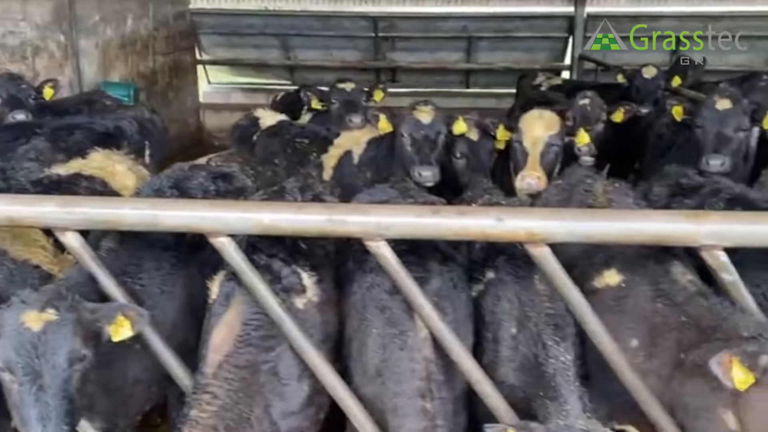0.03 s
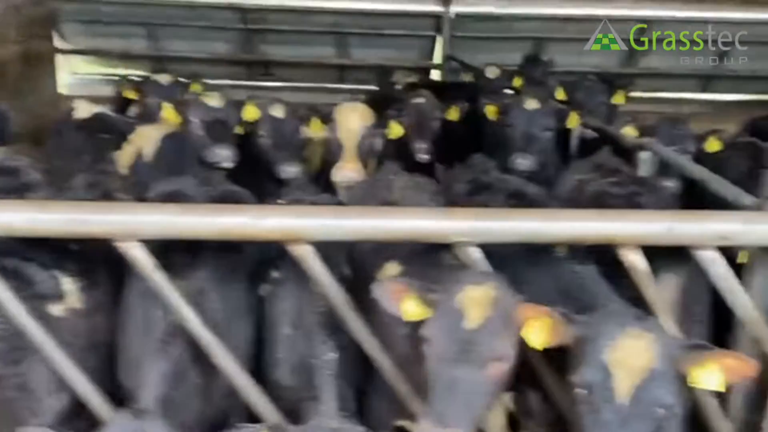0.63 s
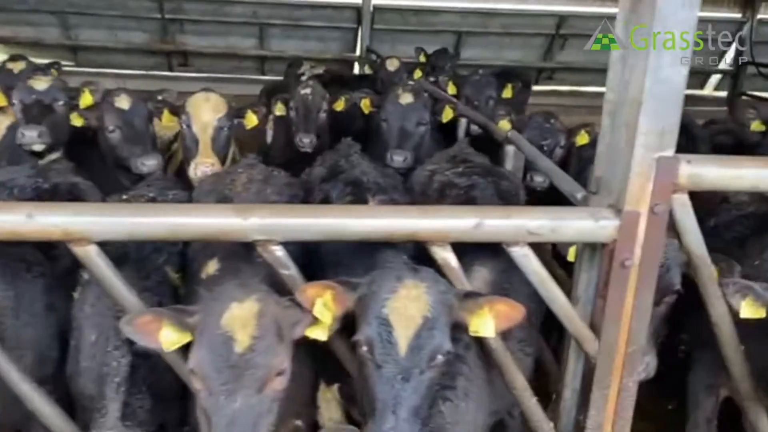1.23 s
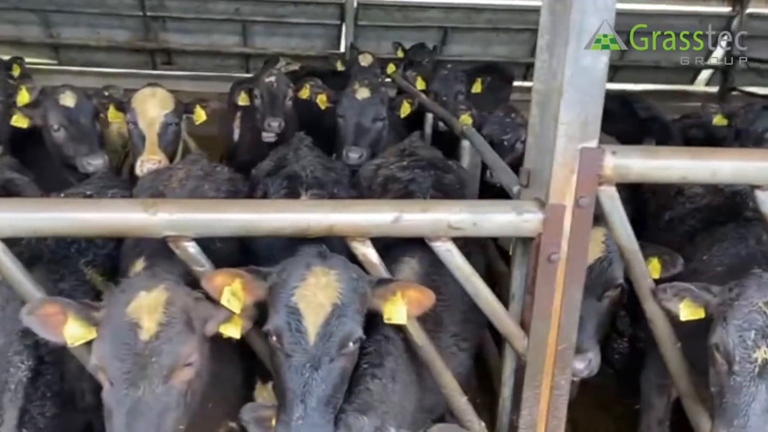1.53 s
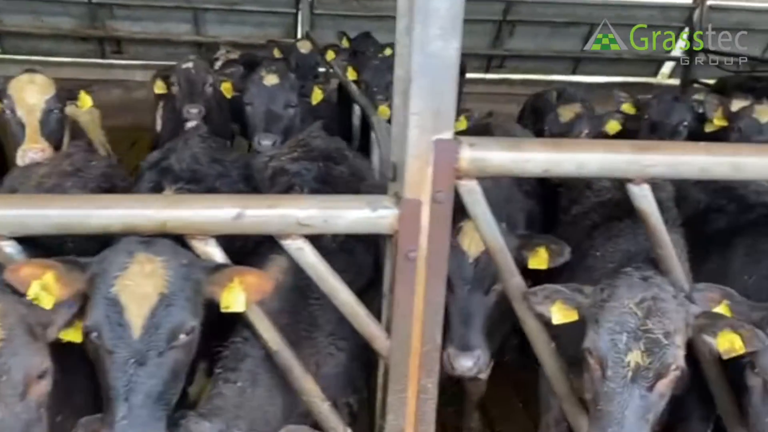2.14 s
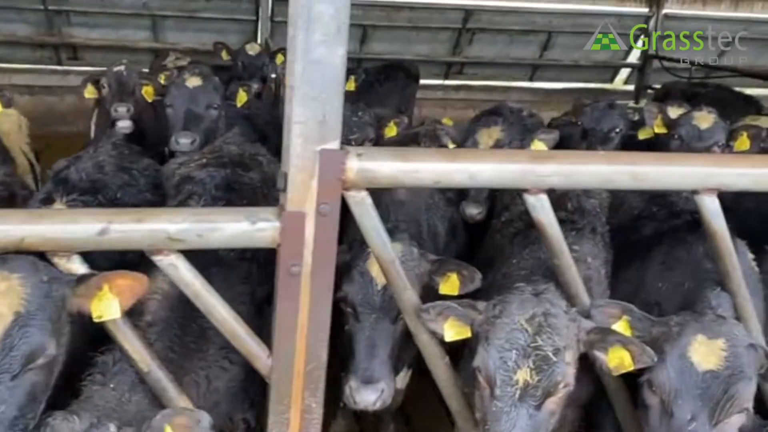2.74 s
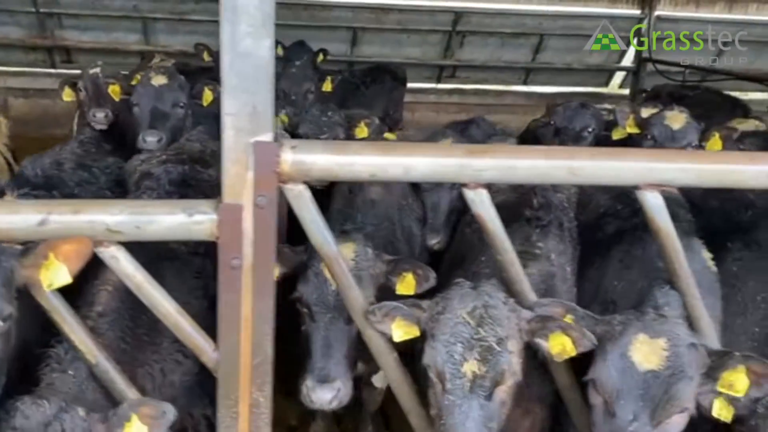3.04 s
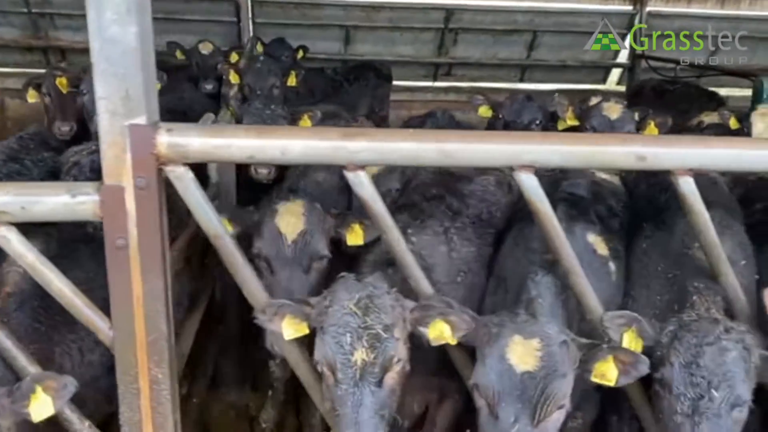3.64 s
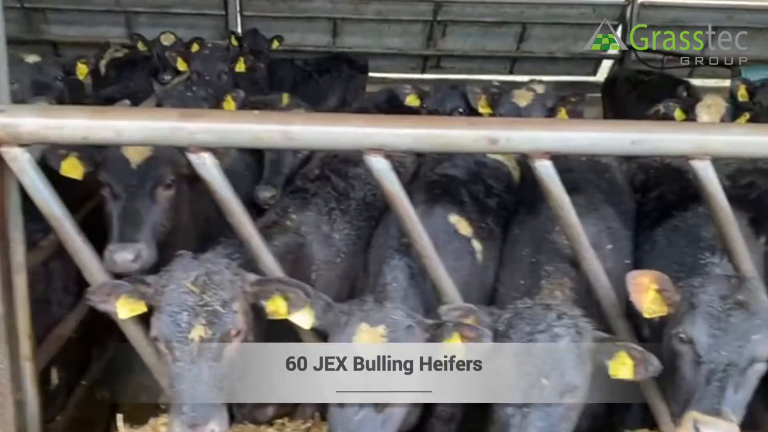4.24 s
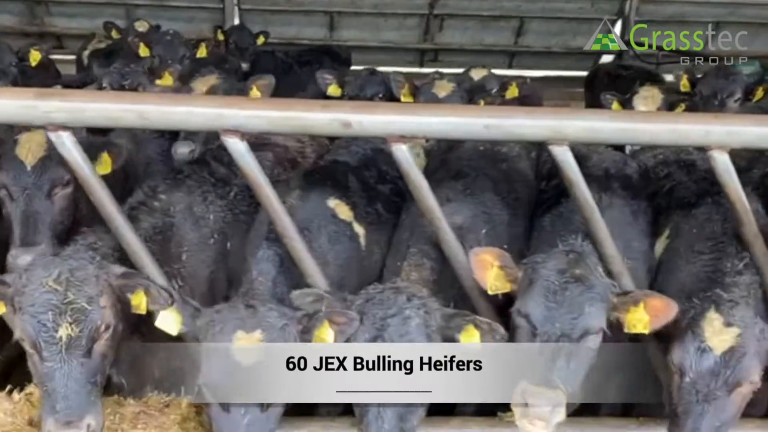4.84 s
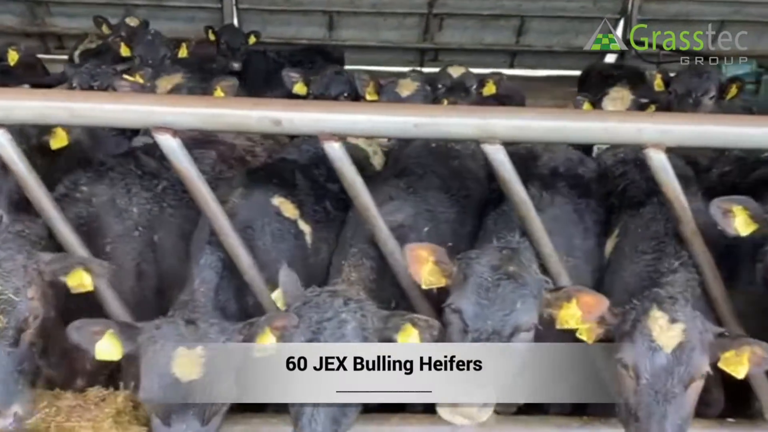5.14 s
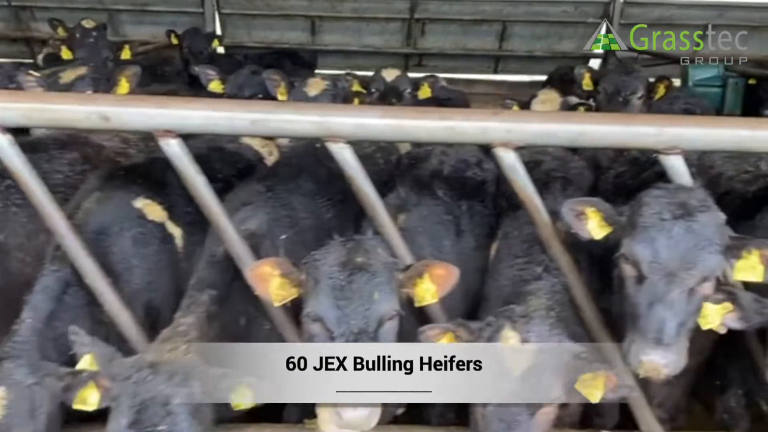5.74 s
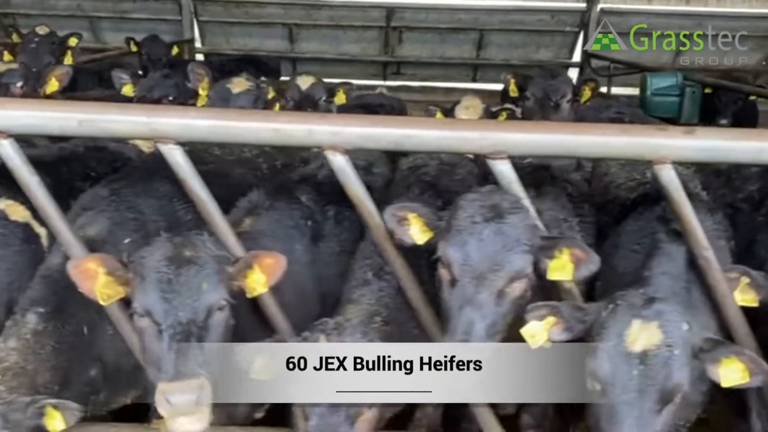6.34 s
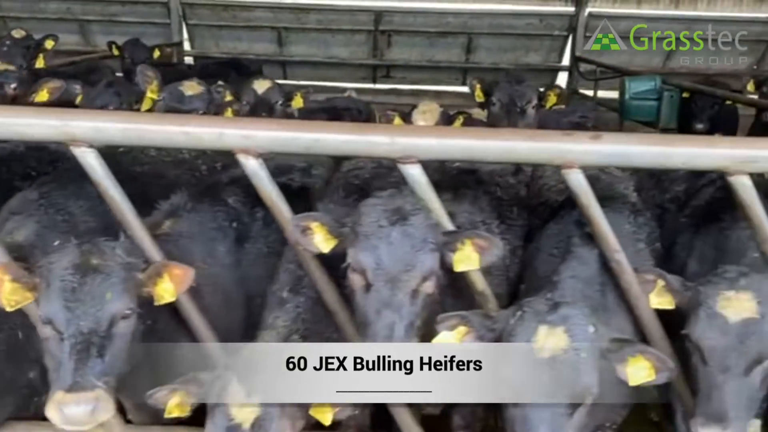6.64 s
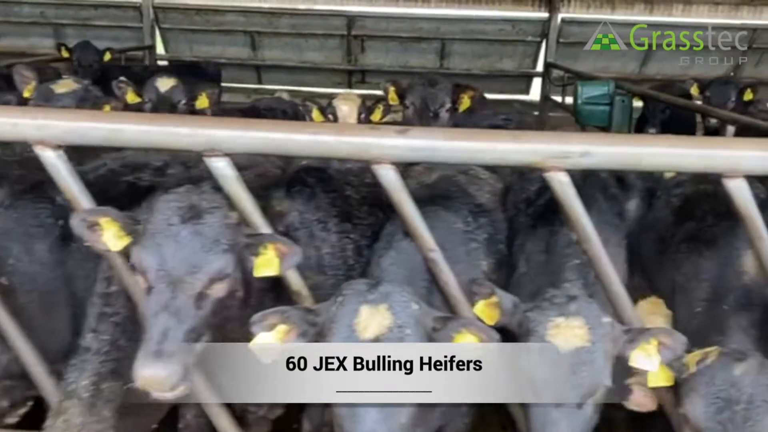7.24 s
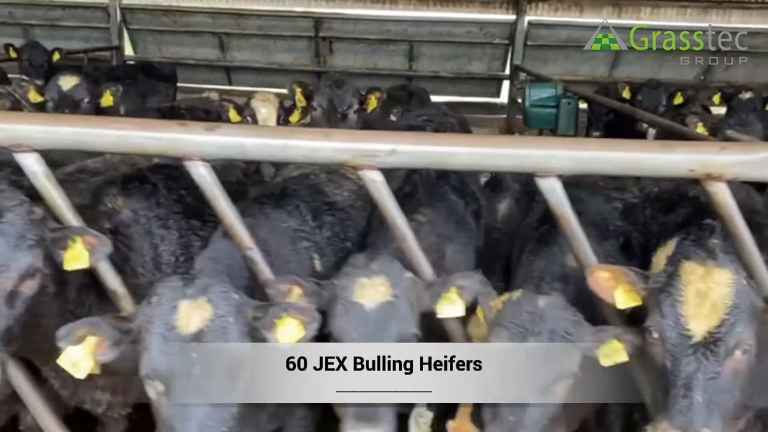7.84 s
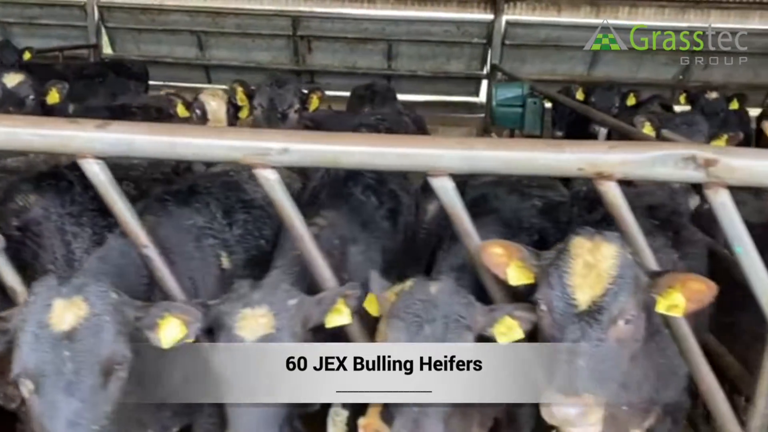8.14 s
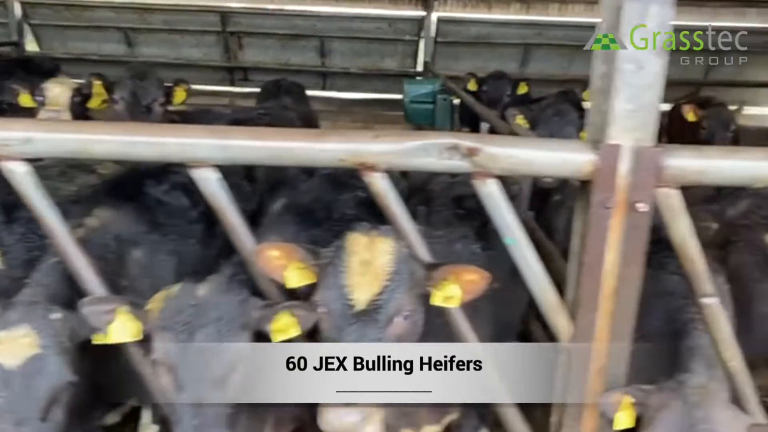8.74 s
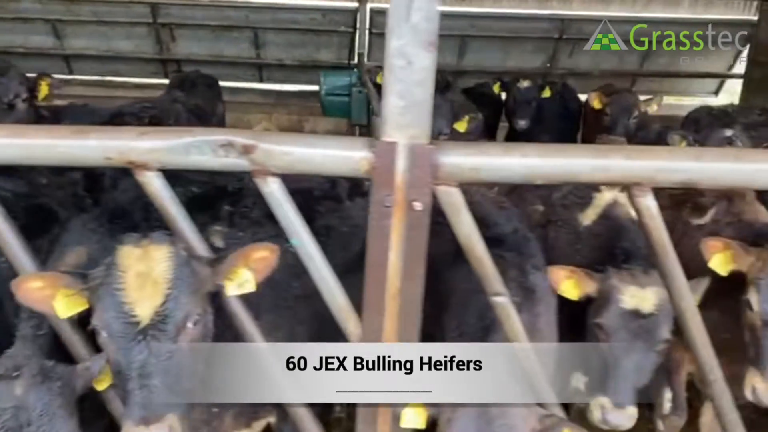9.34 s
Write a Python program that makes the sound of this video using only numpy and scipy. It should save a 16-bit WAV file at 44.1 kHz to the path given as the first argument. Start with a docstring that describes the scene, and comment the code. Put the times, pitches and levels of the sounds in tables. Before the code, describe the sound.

In an open cattle shed, light puffs of wind touch the microphone, then grow into hard, uneven gusts that rumble and thump. Beneath them a soft wash of shuffling animals and rustling fodder slowly fades in. Stalks snap faintly close by, a little to the left, as the cattle feed. Near the end a steel barrier clinks lightly four times and one more hard gust hits.

```python
"""An open cattle shed, from a camera's stereo microphone in the passage, near heifers at a steel barrier.
Light eddies touch both ports first, while the wash under the roof and the rustle of fodder fade in
over five seconds. From about 2.5 s gusts buffet the microphone hard, and close by, a little to the
left, stalks snap as the herd pulls at its feed. From 7.5 s the barrier clinks four times,
and one more hard gust hits just before the end."""
import sys
import numpy as np
from scipy import signal
from scipy.fft import rfft, irfft, next_fast_len
from scipy.io import wavfile
from scipy.ndimage import uniform_filter1d, map_coordinates

SR = 44100
rng = np.random.default_rng(int(sys.argv[2]) if len(sys.argv) > 2 else 0)


def to_wav(sig):
    """Store sig (one row per channel, or 1-D mono) as 16-bit WAV at the path in sys.argv[1].

    Samples outside -1..1 are clipped; the rate is SR.
    """
    pcm = np.clip(np.atleast_2d(sig), -1, 1) * 32767
    pcm = np.round(pcm).astype(np.int16)
    wavfile.write(sys.argv[1], SR, pcm.T)  # frames by channels


N = 422919

# gusts over the microphone, large eddies rumbling, small ones fluttering:
# start_s, hold_s, rumble_db, flutter_db
PORT_GUSTS = [(0.322, 0.11, -65.5, -75), (0.778, 0.15, -50, -58), (0.998, 0.12, -56.5, -76),
              (1.348, 0.063, -54.5, -61.5), (1.562, 0.079, -53, -59.5), (1.68, 0.029, -46.5, -48),
              (1.973, 0.059, -50, -58.5), (2.419, 0.17, -36.5, -45), (2.653, 0.053, -35, -48),
              (2.793, 0.07, -40, -51.5), (2.941, 0.029, -36, -39), (3.058, 0.094, -34, -47.5),
              (3.156, 0.045, -28, -37), (3.202, 0.023, -28, -33.5), (3.261, 0.094, -34, -37.5),
              (3.72, 0.1, -39, -48.5), (3.964, 0.041, -39, -51.5), (4.07, 0.22, -42, -50.5),
              (4.535, 0.036, -39, -54), (4.698, 0.21, -37.5, -47.5), (4.813, 0.095, -38.5, -46.5),
              (5.323, 0.18, -48, -53), (5.813, 0.019, -29, -39.5), (5.926, 0.14, -40, -59),
              (6.289, 0.042, -33.5, -46.5), (6.402, 0.19, -32.5, -45), (6.838, 0.22, -39.5, -56),
              (7.727, 0.01, -37, -71), (7.833, 0.039, -29, -41), (7.969, 0.083, -35, -50),
              (8.17, 0.09, -37.5, -51), (8.477, 0.045, -39.5, -54.5), (8.652, 0.016, -37.5, -64),
              (9.182, 0.029, -33, -38.5), (9.239, 0.065, -29, -45), (9.44, 0.051, -34, -44.5),
              (9.556, 0.031, -33.5, -48)]
# the breeze between gusts: time_s, rumble_db
BREEZE_LEVELS = [(0.0, -109), (0.13, -83.5), (0.4, -66.5), (1.25, -65.5), (1.8, -48.5), (2.2, -54.5),
                 (2.3, -46.5), (2.85, -54), (3.45, -42), (3.66, -54.5), (4.3, -45), (4.65, -41),
                 (4.97, -38.5), (5.07, -46.5), (5.3, -49), (5.76, -48.5), (6.2, -42.5), (6.68, -42.5),
                 (7.05, -46.5), (7.62, -49.5), (7.8, -45.5), (8.1, -43), (8.4, -52), (8.9, -46),
                 (9.14, -33.5), (9.3, -35.5), (9.42, -43.5)]
# colours of large eddies, small eddies and hard gusts at the ports: frequency_hz, relative_db
RUMBLE_SPECTRUM = [(15, -45), (30, -15.5), (50, 0.5), (66, 4), (100, -0.5), (160, -5.5), (250, -9),
                   (400, -15.5), (700, -43), (2000, -120)]
FLUTTER_SPECTRUM = [(100, -35.5), (220, -0.5), (350, 3), (550, 2.5), (800, -6), (1100, -14.5), (1600, -45),
                    (3000, -36), (6000, -120)]
TEARING_SPECTRUM = [(300, -11), (700, -1.5), (1300, 3.5), (2000, -12), (3200, -27.5), (6000, -35),
                    (12000, -75)]
# single eddies that hit the ports: start_s, level_db, centre_hz, edge_db
EDDY_HITS = [(0.312, -53.5, 476, -90), (0.44, -59, 340, -85), (0.531, -56, 494, -82),
             (0.756, -47.5, 604, -66), (0.886, -41.5, 248, -80), (1.32, -48, 140, -88),
             (1.567, -42, 110, -83), (1.626, -42.5, 160, -78), (1.697, -36.5, 198, -74),
             (1.806, -45.5, 160, -80), (2.01, -41, 457, -66), (2.413, -37, 486, -62),
             (2.548, -29, 574, -62), (2.582, -32.5, 450, -56), (2.665, -27, 480, -49.5),
             (2.674, -30, 90, -75), (2.951, -21, 515, -43.5), (3.143, -27, 410, -50),
             (3.197, -16.5, 396, -50), (3.212, -24.5, 220, -40.5), (3.217, -30, 560, -35),
             (3.253, -29, 624, -48), (3.269, -26, 746, -45), (3.278, -27, 557, -39.5),
             (3.287, -21.5, 550, -42.5), (3.312, -30, 560, -44.5), (3.333, -25, 133, -73),
             (3.716, -32.5, 335, -70), (3.806, -31, 128, -80), (3.837, -33, 110, -80),
             (3.887, -23, 197, -72), (3.97, -32, 447, -72), (4.073, -31.5, 420, -54),
             (4.207, -29, 323, -72), (4.234, -34.5, 98.5, -80), (4.34, -43, 110, -80),
             (4.532, -32, 420, -79), (4.82, -24, 460, -50), (4.904, -27.5, 85, -80),
             (5.105, -31.5, 204, -79), (5.154, -36, 108, -80), (5.211, -41, 191, -80),
             (5.412, -32.5, 179, -80), (5.605, -28.5, 260, -75), (5.802, -23.5, 430, -59),
             (5.809, -18.5, 406, -64), (5.837, -22.5, 410, -62), (5.852, -29, 80, -78),
             (5.925, -33.5, 218, -80), (5.98, -32, 233, -78), (6.03, -34.5, 263, -78),
             (6.087, -30.5, 533, -62), (6.34, -25, 510, -50), (6.392, -24, 327, -68),
             (6.409, -25.5, 250, -62), (6.466, -21, 437, -54), (6.511, -17.5, 252, -51),
             (6.624, -26.5, 99, -80), (6.738, -27, 131, -80), (6.893, -34.5, 650, -72),
             (6.983, -32, 110, -80), (7.029, -37, 300, -72), (7.123, -35.5, 150, -80),
             (7.163, -32.5, 97, -80), (7.343, -35, 170, -80), (7.53, -34, 220, -80), (7.828, -25, 447, -70),
             (7.929, -29, 418, -55), (8.003, -22.5, 96, -80), (8.038, -36, 430, -52),
             (8.219, -26, 500, -66), (8.643, -31.5, 397, -67), (9.169, -29, 690, -67),
             (9.2168, -16, 674, -43.5), (9.253, -24, 516, -57)]
# stalks breaking close by: start_s, level_db, centre_hz
STALK_SNAPS = [(2.73, -60, 4500), (3.3367, -52, 7500), (3.925, -48, 4100), (4.351, -59, 4500),
               (5.331, -57, 3800), (6.017, -51, 5850), (6.046, -53, 3600), (6.442, -55, 4470),
               (6.469, -54, 4200), (6.5414, -45, 5650), (6.94, -49, 4150), (7.149, -53, 3000),
               (7.287, -54, 10300), (7.9363, -47, 4160), (8.044, -56.5, 6000), (8.204, -52.5, 6300),
               (8.408, -53.5, 5460), (8.571, -50.5, 5470), (8.584, -58, 5000), (8.613, -46.5, 4550),
               (8.681, -47, 3400), (8.855, -49.5, 7150), (9.056, -52.5, 6000), (9.11, -45.5, 3280),
               (9.4443, -48, 5430), (9.503, -43.5, 7400)]
# mouthfuls of fodder pulled and dragged: middle_s, level_db, centre_hz, length_s
FODDER_SWISHES = [(0.704, -76, 7100, 0.069), (1.646, -70, 2980, 0.1), (2.09, -71, 9300, 0.07),
                  (4.492, -64, 10500, 0.041), (6.195, -52.5, 1840, 0.013), (7.153, -52, 1060, 0.025),
                  (7.201, -55.5, 1120, 0.086), (7.77, -56, 4170, 0.04), (8.448, -51.5, 2060, 0.036),
                  (8.618, -62, 5500, 0.065), (9.528, -68, 10800, 0.059)]
# light knocks on the barrier and the band each excites most: start_s, level_db, centre_hz
BARRIER_KNOCKS = [(7.576, -42, 2840), (7.748, -44, 4300), (8.68, -39, 2060), (9.11, -42.5, 2900)]
# modes of the barrier's steel tubes: pitch_hz, relative_db, t60_s
TUBE_MODES = [(1760, 3, 0.027), (1977, 7, 0.04), (2260, 6, 0.04), (2900, -4, 0.03), (3800, 3, 0.03),
              (4540, -2, 0.035)]
# how busily the herd feeds near the microphone: time_s, gain_db
FEEDING_ACTIVITY = [(3.7, -1), (5.15, -3.5), (5.8, 1.5), (6.9, -0.5), (7.3, 0.5), (8.2, 0), (8.55, 2),
                    (9.15, 2), (9.35, -3), (9.5, 2.5)]
# colours of stirred fodder and of the wash under the roof: frequency_hz, relative_db
STRAW_SPECTRUM = [(1200, -20), (3000, -2), (4700, 0), (6000, -3), (7600, -2.5), (9000, -1.5), (10800, -3.5),
                  (12000, -9)]
HALL_SPECTRUM = [(60, -17), (200, 1), (600, 4), (1100, 1), (1600, -3.5), (2600, -8.5), (4000, -15.5),
                 (7000, -22.5), (12000, -50)]
# decay of the shed's echo: frequency_hz, t60_s
SHED_DECAY = [(200, .7), (2000, 0.26), (10000, 0.14)]
# left-right likeness of sound arriving from all around: frequency_hz, correlation
PORT_LIKENESS = [(200, 1), (600, 0.054), (1240, -0.28), (2600, 0.46), (3800, 0.65), (5500, 0.45),
                 (7100, 0.94), (8000, 0.82), (8400, -1.7), (9400, -2), (10000, -0.11), (10900, 1)]
# the edge below which the bass narrows to mono: time_s, edge_hz
MONO_BASS_EDGE = [(1.75, 8), (2, 410), (2.4, 496), (4, 705), (6.1, 720), (7.3, 320), (9.5, 360)]

GUST_ATTACK_S, RUMBLE_T60_S, FLUTTER_T60_S = 0.032, 0.32, 0.16  # the small eddies die first
PUFFS_PER_S, PUFF_RISE_S, LULL_DB = 22, 0.008, -8.5
GUST_PUFFING = 0.32  # share of the puffing, in dB, left inside a gust
BREEZE_FLUTTER_DB = -14  # against the breeze's rumble
PORT_HZ, PORT_T60_S = 74, 0.13  # the low boom an eddy leaves in the microphone
STRAW_DB, HALL_DB, WHINE_HZ = -72.5, -58, 1372
HALL_FOLLOWS = 0.59  # share of the feeding gain, in dB, that the wash follows
FADE_START_S, FADE_S = 0.059, 4.75  # straw and wash come up evenly
TOP_HZ = 11900


def wind():
    """Turbulence right at the ports: eddies come in bursts, and hard gusts tear into the treble."""
    rumble_db, flutter_db = wind_levels()
    bursts = wobble(75)
    rumble = steadied(port_sound(eddies(bursts, depth_db=3.0), RUMBLE_SPECTRUM), seconds=0.045)
    flutter = steadied(port_sound(eddies(bursts, depth_db=4.0), FLUTTER_SPECTRUM), seconds=0.04)
    tearing = steadied(port_sound(eddies(bursts, depth_db=4.5), TEARING_SPECTRUM), seconds=0.04)
    tearing_db = -50.5 + 1.58 * (flutter_db + 38.0)  # grows faster than the gust itself
    return amp(rumble_db) * rumble + amp(flutter_db) * flutter + amp(tearing_db) * tearing


def wind_levels():
    """Rumble and flutter in dB: gusts add their power to the puffing breeze and fill its lulls."""
    puff_db = puffs()
    breeze_db = timeline(BREEZE_LEVELS) + puff_db
    rumble_power = amp(breeze_db) ** 2
    flutter_power = amp(breeze_db + BREEZE_FLUTTER_DB) ** 2
    puffing = amp(GUST_PUFFING * puff_db)
    for start_s, hold_s, rumble_db, flutter_db in PORT_GUSTS:
        rumble_power += (amp(rumble_db) * puffing * gust(start_s, hold_s, RUMBLE_T60_S)) ** 2
        flutter_power += (amp(flutter_db) * puffing * gust(start_s, hold_s, FLUTTER_T60_S)) ** 2
    return 10 * np.log10(rumble_power), 10 * np.log10(flutter_power)


def gust(start_s, hold_s, t60_s):
    """A gust rises quickly to full strength at start_s, holds and dies away."""
    t = np.arange(N) / SR - start_s
    return np.clip(1 + t / GUST_ATTACK_S, 0, 1) * amp(-60 * np.clip((t - hold_s) / t60_s, 0, 2))


def puffs():
    """Gain in dB of light air: separate puffs at uneven intervals, with lulls between them."""
    gaps, sizes = rng.random((2, 400))
    starts_s = np.cumsum(.35 + 1.95 * gaps ** 2) / PUFFS_PER_S
    train = np.bincount((starts_s * SR).astype(int), amp(-7 * sizes), minlength=N)[:N]
    age = np.arange(SR // 8) / SR / PUFF_RISE_S
    swell = unit(signal.fftconvolve(train, age * np.exp(-age))[:N])
    return 10 * np.log10(swell ** 2 + amp(LULL_DB) ** 2)


def eddies(bursts, depth_db):
    """Spiky turbulent pressure, unrelated at the two ports, packed into shared bursts."""
    return rng.standard_normal((2, N)) * amp(depth_db * bursts + 3.1 * wobble(400))


def port_sound(pressure, spectrum):
    """A minimum-phase colour lets each eddy start sharp and ring down low; mid at rms 1."""
    size = next_fast_len(N + SR // 4)
    log_gain = np.log(amp(along(spectrum, np.fft.rfftfreq(size, 1 / SR))) + 1e-6)
    causal_cepstrum = irfft(log_gain, size) * (1 + np.sign(np.fft.fftfreq(size)))
    pair = irfft(rfft(pressure, size) * np.exp(rfft(causal_cepstrum)), size)[:, :N]
    return pair / np.std(pair.mean(0))


def buffets():
    """An eddy hits the microphone: a blunt pressure pulse, a short ragged wake and a low boom."""
    out, t = np.zeros((2, N)), np.arange(SR // 8) / SR - 1 / 50
    pulse = np.arange(len(t)) == SR // 50 + SR // 500
    port_ring = np.sin(2 * np.pi * PORT_HZ * t) * (t > 0) * decay(t, PORT_T60_S)
    boom = band(port_ring, PORT_HZ, octaves=0.64)
    for start_s, level_db, centre_hz, edge_db in EDDY_HITS:
        wake = rng.standard_normal((2, len(t))) * (t > 0) * decay(t, t60_s=0.097)
        force = pulse * amp(rng.normal(0, 1.7, (2, 1))) + 0.05 * wake
        thump = band(force, centre_hz, octaves=0.59)
        thump = thump / np.abs(thump.mean(0)).max() + PORT_HZ / centre_hz * boom
        edge_hz = 1400 * 2 ** (max(edge_db + 45.0, 0) / 14)  # a harder edge is also brighter
        edge = band((pulse + .14 * wake) * decay(t, t60_s=.022), edge_hz, octaves=.58)
        edge /= np.abs(edge.mean(0)).max()
        add(out, start_s - 1 / 50, amp(level_db) * thump + amp(edge_db + 5.5) * edge)
    return out


def snaps():
    """Close by, a stalk breaks with a bright crack and duller splinters, brief or drawn out."""
    out, t = np.zeros((2, N)), np.arange(SR // 12) / SR - 1 / 200
    for start_s, level_db, centre_hz in STALK_SNAPS:
        fibres = rng.standard_normal((2, len(t))) * (t > 0)
        crack = band(fibres * decay(t, t60_s=.012), centre_hz, octaves=.7)
        splitting = amp(5 * wobble(300, size=len(t))) * decay(t, t60_s=rng.uniform(.06, .18))
        splinters = band(fibres * splitting, .58 * centre_hz, octaves=.65)
        mid, side = unit(unit(crack) + .75 * unit(mid_side(splinters)))
        add(out, start_s - 1 / 200, amp(level_db - 20) * left_right(mid, .8 * side))
    return out


def swishes():
    """Fodder dragged near the microphone swells and fades as a broad, grainy scuff."""
    out, t = np.zeros((2, N)), np.arange(SR // 2) / SR - 1 / 4
    for middle_s, level_db, centre_hz, length_s in FODDER_SWISHES:
        grains = rng.standard_normal((2, len(t))) * amp(3.3 * wobble(400, size=len(t)))
        swell = np.exp(-(2 * t / length_s) ** 2)
        mid, side = unit(mid_side(band(grains, centre_hz, octaves=.4))) * swell
        add(out, middle_s - 1 / 4, amp(level_db - 5.0) * left_right(mid, 0.5 * side))
    return out


def barrier():
    """Necks damp the steel tubes beside the passage, so each knock rings only briefly."""
    out, t = np.zeros((2, N)), np.arange(SR // 4) / SR
    for start_s, level_db, centre_hz in BARRIER_KNOCKS:
        ring = np.zeros((2, len(t)))
        for pitch_hz, mode_db, t60_s in TUBE_MODES:
            envelope = amp(mode_db + rng.normal(0, 1.5, (2, 1))) * decay(t, t60_s)
            ring += envelope * np.sin(2 * np.pi * (pitch_hz * t + rng.random()))
        scuff = rng.standard_normal((2, len(t))) * decay(t, t60_s=.035)
        knock = band(ring + 4.5 * scuff, centre_hz, octaves=.45)
        add(out, start_s, amp(level_db) * knock / np.abs(knock).max())
    return out


def straw():
    """All around, muzzles stir the fodder: fine hiss with clumps of tiny crackles."""
    sizes = amp(4.5 * rng.exponential(size=N).clip(0, 3))
    impulses = (rng.random(N) < 150 / SR * amp(5 * wobble(7))) * sizes
    crackles = unit(impulses * rng.standard_normal((2, N)))
    rustle = patchy(rng.standard_normal((2, N)) + .6 * crackles, depth_db=1.8)
    stirring_db = 1.1 * wobble(12)
    return diffuse(rustle, STRAW_SPECTRUM) * amp(STRAW_DB + stirring_db)


def hall():
    """Farther off, many animals shuffle under the roof: a wash with a faint wavering whine in it."""
    wash = diffuse(patchy(rng.standard_normal((2, N)), depth_db=2.0), HALL_SPECTRUM)
    whine_hz = WHINE_HZ + 3 * wobble(6)
    whine = np.sin(2 * np.pi * np.cumsum(whine_hz) / SR) * amp(-18 + 3 * wobble(2))
    return (wash + whine) * amp(HALL_DB + 0.25 * wobble(12))


def shed_echo(x):
    """The roof and walls answer; the treble dies first."""
    hz, t, noise = signal.stft(rng.standard_normal((2, SR * 3 // 4)), SR, nperseg=256)
    tail = signal.istft(noise * decay(t, along(SHED_DECAY, hz)[:, None]), SR, nperseg=256)[1]
    return signal.fftconvolve(x, tail / np.linalg.norm(tail[0]), axes=1)[:, :N]


def patchy(pair, depth_db):
    """Noise with random patches of gain, a few hundred Hz wide and some tens of ms long."""
    spectra = signal.stft(pair, nperseg=512)[2]
    patches = uniform_filter1d(rng.standard_normal(spectra.shape[1:]), size=7, axis=0)
    patches = uniform_filter1d(patches, size=9, axis=1)
    return signal.istft(spectra * amp(depth_db * unit(patches)), nperseg=512)[1][:, :N]


def steadied(pair, seconds):
    """Noise with its slow chance swells evened out."""
    power = uniform_filter1d(pair.mean(0) ** 2, int(seconds * SR))
    return pair / np.sqrt(np.abs(power) + 1e-6)


def diffuse(pair, spectrum):
    """Coloured sound from all around the microphone, its mid at rms 1."""
    mid, side = mid_side(filtered(pair, lambda hz: amp(along(spectrum, hz))))
    return left_right(mid, side) / np.std(mid)


def mid_side(pair):
    """Two unrelated signals weighted as the mid and side of sound from all around."""
    def weights(hz):
        angle = np.arccos(np.clip(along(PORT_LIKENESS, hz), -1, 1)) / 2
        return np.array([np.cos(angle), np.sin(angle)])
    return filtered(pair, weights)


def left_right(mid, side):
    """Two channels from their sum and difference parts."""
    return np.array([mid + side, mid - side])


def band(x, centre_hz, octaves):
    """x through a bell around a centre frequency."""
    return filtered(x, lambda hz: np.exp(-.5 * (np.log2((hz + 1) / centre_hz) / octaves) ** 2))


def filtered(x, response):
    """x through a gain given as a function of frequency."""
    n = x.shape[-1]
    size = next_fast_len(n + SR // 8)
    return irfft(rfft(x, size) * response(np.fft.rfftfreq(size, 1 / SR)), size)[..., :n]


def wobble(rate, size=N):
    """A smooth random curve, rate knots a second."""
    knots = rng.standard_normal(int(size * rate / SR) + 4)
    return map_coordinates(knots, [np.arange(size) * rate / SR])


def along(points, hz):
    """(frequency_hz, value) points read on a log axis."""
    points_hz, values = np.transpose(points)
    return np.interp(np.log(hz + 1), np.log(points_hz + 1), values)


def timeline(points):
    """(time_s, value) points read at every sample."""
    return np.interp(np.arange(N) / SR, *np.transpose(points))


def decay(t, t60_s):
    """Gain that falls 60 dB in t60_s on either side of t = 0."""
    return amp(-60 * np.abs(t) / t60_s)


def amp(db):
    """Decibels to gain."""
    return 10 ** (np.asarray(db) / 20)


def unit(x):
    """x at rms 1."""
    return x / np.sqrt(np.mean(x ** 2) + 1e-20)


def add(track, start_s, sound):
    """Mix a sound into the track from start_s on."""
    start = max(round(start_s * SR), 0)
    part = track[:, start:start + sound.shape[-1]]
    part += sound[..., :part.shape[-1]]


def scene():
    """From the passage: the herd a little to the left, under the wind on the microphone."""
    near = snaps() + swishes() + barrier()
    feeding_db = timeline(FEEDING_ACTIVITY)
    bed = amp(HALL_FOLLOWS * feeding_db) * hall() + amp(feeding_db) * straw()
    fade_in = np.clip((np.arange(N) / SR - FADE_START_S) / FADE_S, 1e-4, 1)
    herd = near + amp(-7.5) * shed_echo(near) + fade_in * bed
    return herd * amp([[.7], [-.7]]) + wind() + buffets()


def record(dry):
    """At the camera the bass narrows to mono, and nothing passes above TOP_HZ."""
    hz, t, side_spectra = signal.stft((dry[0] - dry[1]) / 2, SR, nperseg=1024)
    edge_hz = np.interp(t, *np.transpose(MONO_BASS_EDGE))
    high_pass = 1 - 1 / (1 + (hz[:, None] / edge_hz) ** 8)
    side = signal.istft(side_spectra * high_pass, SR, nperseg=1024)[1][:N]
    return filtered(left_right(dry.mean(0), side), lambda hz: hz < TOP_HZ)


dry = scene()
out = record(dry)
to_wav(out)
```